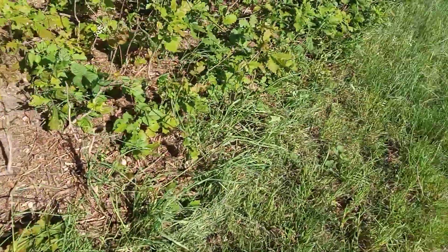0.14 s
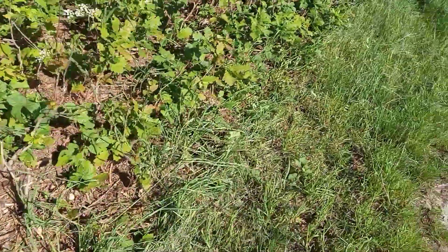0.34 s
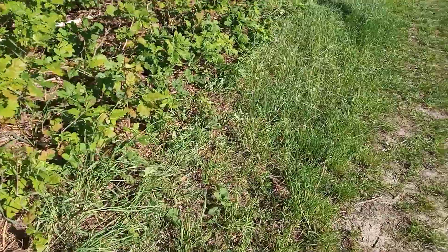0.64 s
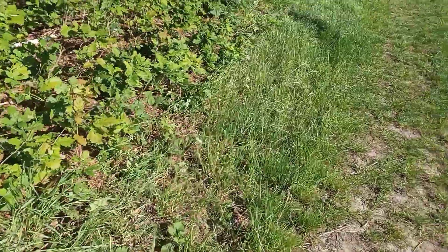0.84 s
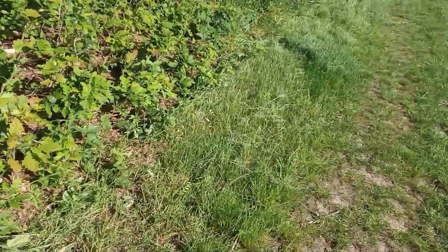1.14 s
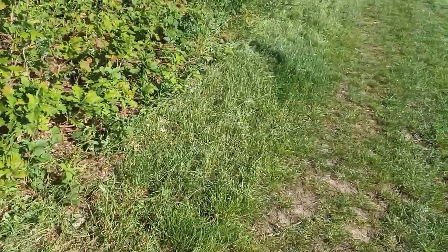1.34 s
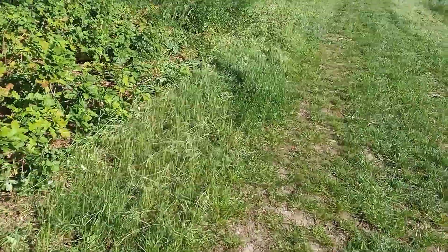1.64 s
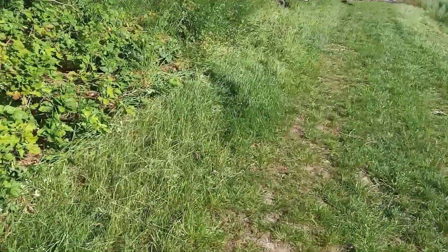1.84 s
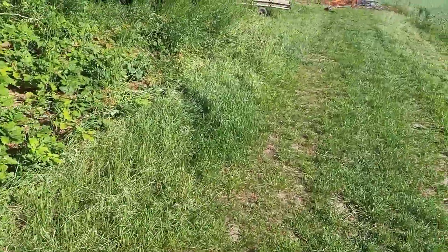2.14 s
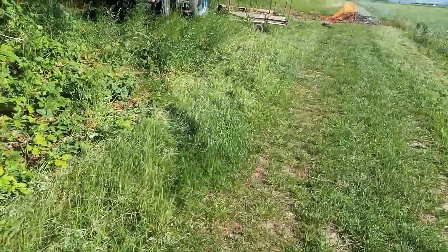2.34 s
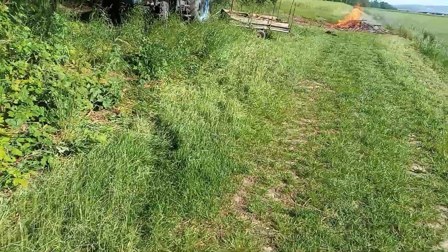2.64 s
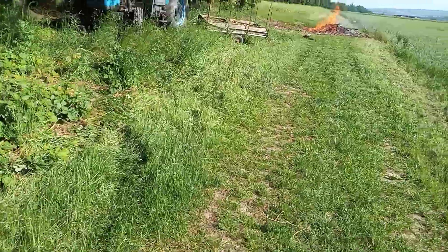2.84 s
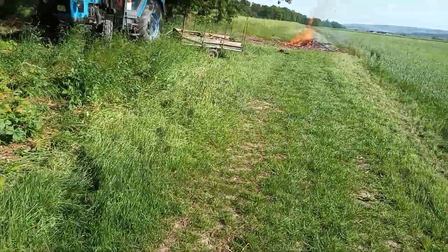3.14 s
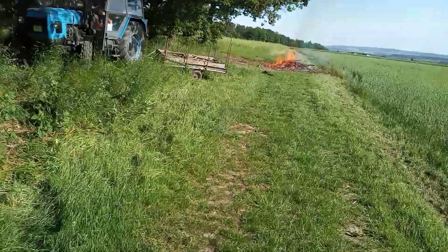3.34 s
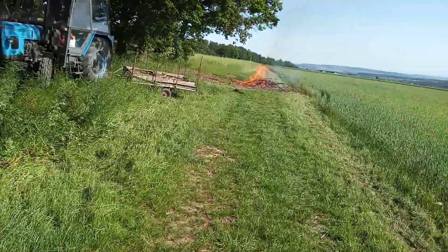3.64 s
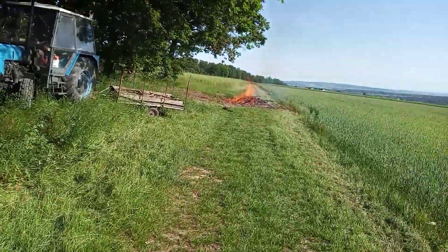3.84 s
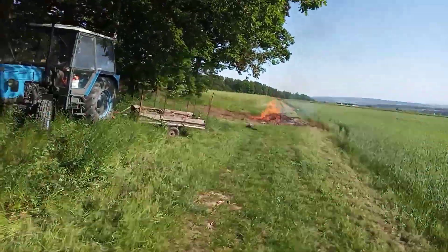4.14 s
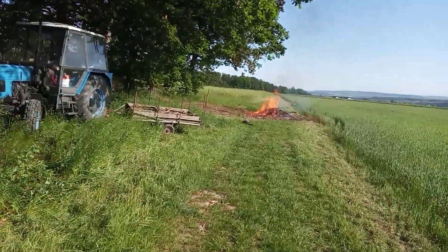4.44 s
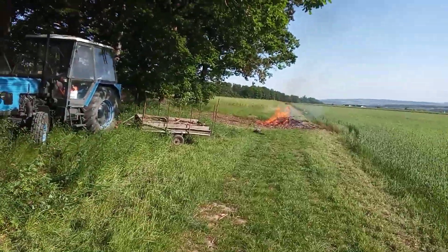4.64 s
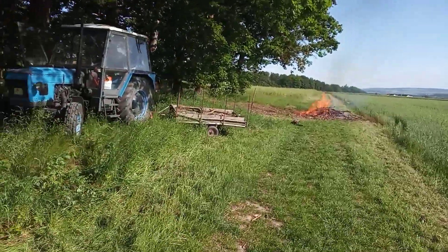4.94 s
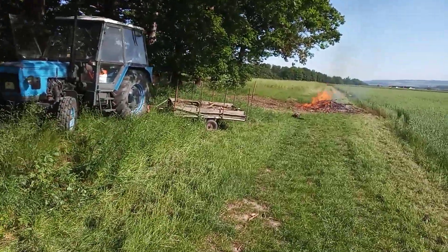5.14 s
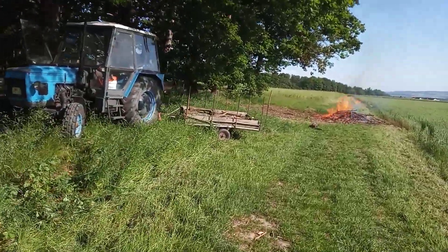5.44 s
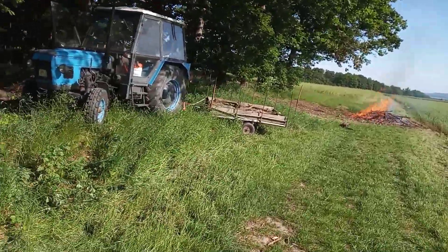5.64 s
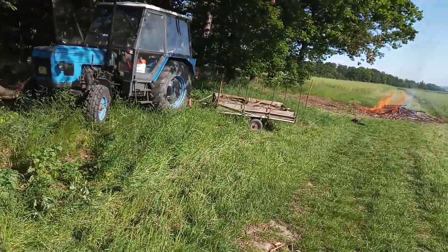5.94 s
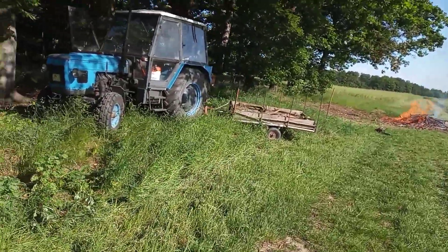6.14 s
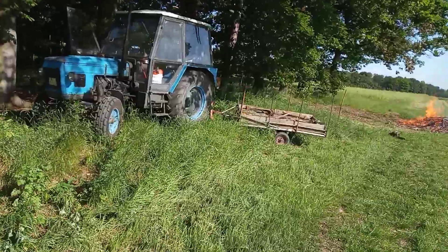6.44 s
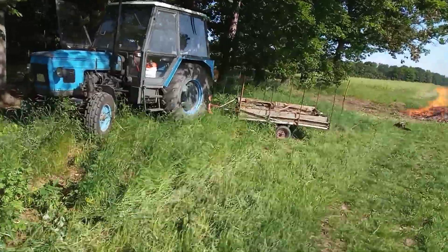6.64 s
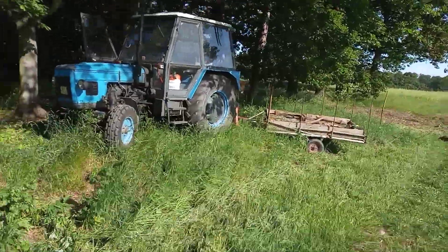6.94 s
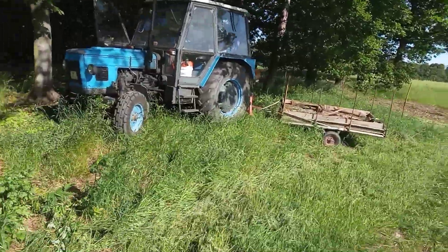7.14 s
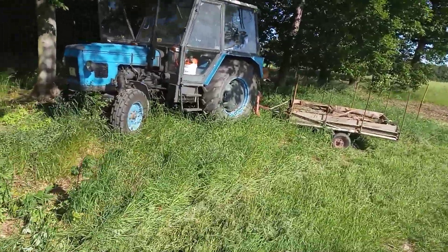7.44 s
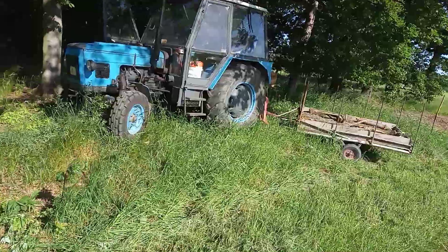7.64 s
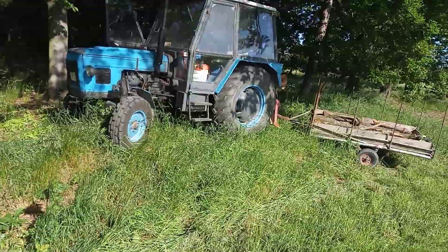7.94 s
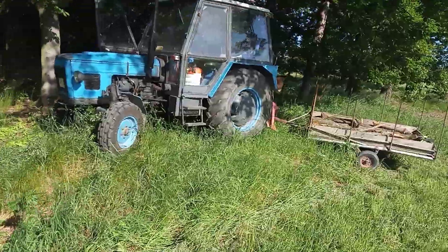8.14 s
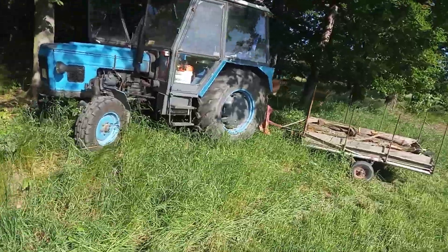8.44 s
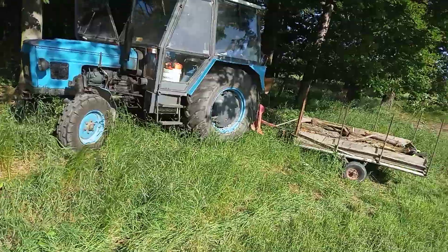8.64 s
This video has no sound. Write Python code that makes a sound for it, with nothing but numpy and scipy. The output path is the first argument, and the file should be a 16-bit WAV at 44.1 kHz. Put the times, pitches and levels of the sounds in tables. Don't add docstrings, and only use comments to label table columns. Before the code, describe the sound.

Dry crackling and steady fizzing of a burning brush pile outdoors, soft grass swishes, gusty low rumble, and faint bird notes early on.

```python
import sys
import numpy as np
from scipy import signal
from scipy.fft import rfft, irfft
from scipy.io import wavfile
from scipy.ndimage import uniform_filter1d

SR = 44100
rng = np.random.default_rng(int(sys.argv[2]) if len(sys.argv) > 2 else 0)


def transcribe(signal):
    frames = np.atleast_2d(signal).T
    limited = np.clip(frames, -1, 1)
    pcm = np.round(limited * 32767).astype(np.int16)
    wavfile.write(sys.argv[1], SR, pcm)


def invert_db(x):
    u = np.asarray(x, float) / 20
    return 10 ** u


N = 387198

# time_s, hiss_db, treble_gain_db
FIRE_VIGOUR = [(0.0, -52.5, -8), (0.24, -52.5, -9), (0.5, -59.5, -12), (0.7, -62, -9.5),
               (0.9, -55.5, -10.5), (1.69, -55, -17), (2.15, -54.5, -8), (2.5, -51, -11),
               (3.05, -59.5, -13), (3.4, -55, -13), (3.6, -52.5, -8.5), (4.35, -50, -8), (5.2, -50, -5),
               (6.21, -52, -6), (7.04, -51.5, -7), (7.78, -52.5, -6.5), (8.1, -48, -7), (8.78, -52, -10)]
# start_s, peak_db, body_db (relative), sizzle_db (relative)
CRACKS_GROUND = [(0.249, -29.5, -24, -20), (0.4129, -24.5, -24, -22.5), (0.5633, -34, -14.5, -15),
                 (0.6855, -29.5, -24.5, -28), (0.9602, -32, -23.5, -22), (0.9963, -30, -21, -24),
                 (1.0794, -32, -23, -19), (1.1601, -35.5, -13, -26), (1.1856, -25, -22.5, -26),
                 (1.206, -20, -29, -28), (1.3151, -31.5, -23.5, -19), (1.4949, -36.5, -23.5, -26),
                 (1.7315, -30.5, -29.5, -23), (1.8079, -27, -22, -21), (1.9668, -32, -19.5, -22.5),
                 (2.4894, -29.5, -24, -19), (2.6096, -32, -23, -16.5), (2.896, -29.5, -28.5, -27),
                 (2.9217, -27.5, -30.5, -28), (3.1462, -28.5, -18.5, -20), (3.3958, -37, -22.5, -24),
                 (3.647, -30.5, -16, -21), (3.6726, -29.5, -23.5, -28), (3.712, -33, -28, -25),
                 (3.867, -31, -24.5, -23), (3.949, -30.5, -19.5, -22), (3.9629, -26.5, -21, -20),
                 (4.0189, -33.5, -14, -24), (4.219, -30.5, -16.5, -23), (4.2939, -14.5, -18, -20.5)]
# start_s, peak_db, body_db (relative), sizzle_db (relative)
CRACKS_FIRE = [(4.771, -33, -25, -12), (4.8209, -34.5, -31, -17), (4.8785, -33, -19.5, -16),
               (5.0775, -30.5, -18, -20), (5.3168, -24, -25.5, -15), (5.3951, -29.5, -18.5, -13),
               (5.411, -19, -28, -24), (5.586, -32, -20.5, -16), (5.6156, -18, -29, -24.5),
               (5.6984, -27.5, -23, -19), (5.9061, -24, -22.5, -20), (6.1089, -29.5, -18.5, -25),
               (6.1396, -28, -21.5, -23), (6.1946, -23.5, -19.5, -24), (6.372, -18, -23, -18.5),
               (6.7946, -33, -24.5, -21.5), (6.9156, -29, -25, -19), (7.3152, -29.5, -27.5, -13),
               (7.555, -31.5, -32, -20), (7.714, -33.5, -18, -11), (7.8577, -24, -24, -25),
               (7.9294, -30, -20, -13.5), (8.0186, -26.5, -26, -21), (8.2514, -29.5, -23, -14),
               (8.3763, -23.5, -36, -28), (8.5105, -32, -23.5, -5.5), (8.527, -19, -34.5, -18),
               (8.5798, -23.5, -23, -13), (8.6616, -34, -18.5, -11.5), (8.713, -24.5, -23.5, -12)]
# start_s, peak_db, body_db (relative), sizzle_db (relative)
SMALL_TICKS = [(0.3361, -35, -22, -21), (0.7751, -39, -33, -13), (1.4277, -40, -13, -18),
               (1.5763, -30, -23, -18), (1.8357, -32, -20, -26), (1.9046, -37, -30, -20),
               (2.1675, -34, -21, -12), (2.6798, -37, -22, -17), (2.8125, -38, -22, -18),
               (4.573, -34, -19, -15), (4.6942, -34, -25, -16), (4.9082, -34, -22, -26),
               (5.006, -36, -25, -25), (5.1324, -41, -11, -16), (5.1622, -36, -16, -17),
               (5.3303, -24, -32, -23), (5.66, -26, -32, -19), (5.7169, -28, -23, -22),
               (6.0496, -38, -26, -14), (6.8493, -33, -18, -11), (7.441, -35, -25, -20)]
# start_s, peak_db, pitch_hz, echo_db (relative)
WOOD_POPS = [(0.632, -47, 1510, -30), (0.649, -42.5, 3080, -47), (0.843, -32, 3440, -29),
             (1.003, -40, 1300, -31), (1.737, -48.5, 1370, -24), (2.611, -73, 1500, -28),
             (3.146, -46.5, 3240, -15.5), (4.293, -26, 3140, -22), (5.414, -35.5, 3300, -27),
             (6.194, -44, 3570, -27.5), (6.371, -46.5, 3450, -13.5), (7.856, -49, 3300, -20),
             (8.688, -35, 1000, -18), (8.714, -43.5, 3350, -23)]
# low_hz, high_hz
FIRE_BANDS = [
    (900, 1800),
    (2700, 4500),
    (4500, 8500),
    (8500, 16500),
]
# frequency_hz, gain_db
PORT_COLOUR = [(1150, -29.5), (1530, -7), (1670, -14), (1850, -32), (2500, -31.5), (3280, -12.5),
               (3770, -22), (5200, -9.5), (6500, 1), (8000, -14), (10000, -16), (10700, -21),
               (11500, -17.5), (15300, -27)]
# peak_s, deep_db, die_s (by 30
# dB), upper_db (relative)
WIND_GUSTS = [(0.0, -53.5, 1.0, -4), (0.27, -57, 0, -2), (0.49, -80, 3, 13), (2.71, -78, .45, 5),
              (3.13, -70.5, 0.5, -4.5), (3.42, -65.5, .5, -8), (3.56, -65, .08, -15),
              (4.01, -65.5, 1.5, -8), (4.27, -67.5, 0, 6), (4.67, -49, 0.6, -3.5), (4.84, -49, .6, 0.5),
              (4.99, -45, .2, 10), (5.13, -54, 0.14, 12), (5.18, -50.5, 1.0, -4), (5.5, -52, .25, -2),
              (5.82, -51, 0.26, -9), (5.98, -44, 0.15, -4), (6.23, -56, 1.2, -4), (6.47, -45, 0.16, 0),
              (6.54, -48, .1, 4), (6.68, -47, 0.16, -10), (6.85, -55, .25, -4), (7.24, -69, 0.7, -4),
              (7.36, -70, .15, 9), (7.5, -44, .25, -12), (7.62, -63.5, .3, 6), (7.73, -52, 0.6, -4.5),
              (8.76, -75, .3, -1)]
# centre_s, peak_db, pitch_hz, cycles, swing (push 1, suck -1)
CASE_KNOCKS = [(2.5483, -58.5, 700, 2.9, 1), (2.7160, -37.5, 453, 0.46, 0.91),
               (2.7193, -39.5, 500, 0.55, 0.8), (2.7210, -29.5, 425, 0.27, 1),
               (2.7222, -37.5, 148, 0.43, -0.83), (2.858, -57, 400, 0.81, 0.65),
               (2.8617, -34.5, 424, 0.44, 0.73), (2.8663, -41.5, 453, 0.44, 0.89),
               (4.977, -32, 110, 0.66, -0.89), (4.9880, -26, 128, 0.5, -0.87),
               (5.072, -31, 109, 0.58, 0.92), (5.1354, -14, 234, 0.55, -0.37), (5.1356, -41, 520, 1.27, 1),
               (5.4132, -41.5, 890, 1.25, -0.74), (5.415, -39, 80, 0.57, 0.76)]
# centre_s, peak_db,
# pitch_hz, cycles
SOFT_RUSTLES = [(.22, -58, 267, 9.7), (0.847, -49.5, 1650, 4.4), (.87, -61, 1450, 30), (.92, -64, 1220, 35),
                (1.079, -71, 540, 9.4), (1.242, -64, 480, 11), (1.421, -70, 417, 7.6),
                (1.715, -65.5, 630, 13), (2.545, -60.5, 690, 11.3), (2.686, -55, 430, 2.7),
                (2.706, -45, 570, 1.9), (2.721, -50.5, 1700, 5.4), (2.862, -58, 1900, 4.3),
                (4.3, -57, 405, 2.6), (2.743, -70, 485, 6), (3.281, -70, 1150, 40), (4.83, -62.5, 456, 3.8),
                (4.96, -45, 254, 2.6), (5.076, -63, 523, 4.2), (5.369, -59, 970, 17), (5.51, -62, 865, 13),
                (5.901, -67, 417, 5.2), (5.986, -57, 255, 4), (6.201, -64.5, 1050, 25),
                (8.05, -72, 900, 30)]
# peak_s, swish_db, die_s (by 30 dB)
LEG_STRIDES = [(.22, -79, 0.5), (.9, -78.5, 1), (1.3, -77.5, 0.5), (2.05, -78.5, 1.5), (2.75, -83, .8),
               (3.79, -85, 2), (5.13, -78.5, .8), (5.6, -79.5, 2.5), (4.33, -78, 1), (6.42, -78, .6),
               (6.9, -82, .5), (7.3, -80, .7), (8.1, -73, .8)]
# time_s, pitch_hz, level_db
MOTOR_HUM = [(0.0, 112, -66), (0.18, 117.0, -57.5), (0.36, 115.2, -65), (1.13, 115.4, -62.5),
             (1.18, 115.7, -105), (1.27, 115.6, -60.5), (2.16, 116, -95), (2.3, 118, -96)]
# start_s, length_s, level_db
BIRD_WHISTLES = [(1.162, .23, -74), (1.988, 0.21, -70), (2.899, 0.219, -69)]
# time_s, pitch_hz, level_db
THIN_CALL = [
    (1.63, 9409, -71),
    (1.654, 9220, -58),
    (1.72, 9300, -87),
]

LOW_DB, LOW_FOLLOWS, STIR_LOW = -70.5, 0.67, 0.3
MIDDLE_DB, MIDDLE_FOLLOWS, STIR_MIDDLE = -64.5, 0.87, 0.13
TRAIL_S, TRAIL_SHARE = 0.012, 0.5
CRACK_GAIN_DB, BODY_DB, SIZZLE_DB, THUD_DB = -1, 6.5, 4, -12
ECHO_DB, ECHO_FOLLOWS = -22, 0.4
GROUND_S, GROUND_DB = 0.004, -7.5
FOREST_T60_S, FOREST_RISE_S, POP_T60_S = 0.19, 0.017, 0.26
POP_ECHO_DB_PER_OCTAVE = 8
GUST_RISE_S, CALM_DB = 0.12, -97.5
DUCK_FROM_DB, DUCK_SHARE, DUCK_S = -51, 0.53, 0.08
STRIDE_RISE_S, STILL_DB = 0.45, -97
AIR_DB, AIR_BED_DB, AIR_FOLLOWS = -6, -81, 0.15
BIRD_FROM_HZ, BIRD_TO_HZ, BIRD_FADE_DB = 2800, 2450, 6
LIMIT, CUTOFF_HZ = 0.2, 16000


def fire_hiss(port):
    sizes = invert_db(6.2 * np.minimum(rng.exponential(1, N), 3.1)) * rng.choice([-1, 1], N)
    snaps_per_s = 900 * invert_db(5 * drift(25))
    snaps = sizes * (rng.random(N) < snaps_per_s / SR)

    main_db, facing_db = in_time(FIRE_VIGOUR)
    swing_db = main_db - main_db.mean()
    stir_db = stride_level() - STILL_DB - 8.5
    low_db = LOW_DB + LOW_FOLLOWS * swing_db + STIR_LOW * stir_db
    middle_db = MIDDLE_DB + MIDDLE_FOLLOWS * swing_db + STIR_MIDDLE * stir_db
    levels_db = [low_db, middle_db, main_db, main_db + facing_db]

    flare = drift(20.0)
    fade = np.exp(-1 / TRAIL_S / SR)
    trail = np.sqrt(signal.lfilter([1 - fade], [1, -fade], rms_one(snaps) ** 2))
    smooth = rng.standard_normal(N) * (1 - TRAIL_SHARE + TRAIL_SHARE * trail)

    out = 0
    flare_depths_db, snap_shares = [1.4, 1.5, 1.9, 3.4], [0.7, 0.65, 1.1, 1.0]
    for db, depth_db, share, edges in zip(levels_db, flare_depths_db, snap_shares, FIRE_BANDS):
        tinted = rms_one(snaps * invert_db(5.1 * rng.standard_normal(N)))
        mix = signal.fftconvolve(share * tinted + smooth, band(port, *edges))[:N]
        out = out + invert_db(db + depth_db * flare + 1.24 * drift(7.1)) * rms_one(mix)
    return out


def cracks(port):
    s, db, body_db, sizzle_db = np.transpose(CRACKS_GROUND + CRACKS_FIRE + SMALL_TICKS)
    db = db + CRACK_GAIN_DB
    middle_db = body_db + BODY_DB
    shares_db = [middle_db + THUD_DB, middle_db, 0 * db, sizzle_db + SIZZLE_DB]
    echo_db = ECHO_DB + ECHO_FOLLOWS * (body_db - body_db.mean())

    out = 0
    diffuse = signal.fftconvolve(rng.standard_normal(N), port)[:N]
    for share_db, trim_db, edges in zip(shares_db, [-14.5, -7.5, -11, 1], FIRE_BANDS):
        colour = band(port, *edges)
        source = bursts(s, invert_db(db + share_db + trim_db), 0.00067)
        direct = signal.fftconvolve(source, colour / np.abs(colour).max())[:N]
        envelope = forest_echo(s, db + share_db + echo_db, FOREST_T60_S)
        out = out + direct + envelope * rms_one(band(diffuse, *edges))
    return out


def bursts(times, gains, decay_s, size=320):
    out = np.zeros(N + size)
    t = np.arange(size) / SR
    for s, gain, noise in zip(times, gains, rng.standard_normal((len(times), size))):
        late = t - GROUND_S * (0.5 + 0.5 * np.tanh(noise[-1]) ** 2)
        reflection = invert_db(GROUND_DB) * (late > 0) * np.exp(-np.abs(late) / decay_s)
        fall = np.exp(-t / decay_s) + reflection
        snap = 1.91 * np.sign(noise[0]) * (t == 0)
        start = int(s * SR)
        out[start:start + size] += gain * 0.25 * rms_one(snap + fall * noise)
    return out[:N]


def pops():
    s, db, hz, echo_db = np.transpose(WOOD_POPS)
    white, echo = rng.standard_normal(N), 0
    for trim_db, edges in zip([-4, -1, -2], [(330, 1400), (1000, 2060), (2000, 3050)]):
        octaves_away = np.abs(np.log2(hz / np.sqrt(np.prod(edges))))
        envelope = forest_echo(s, db + echo_db - POP_ECHO_DB_PER_OCTAVE * octaves_away, POP_T60_S)
        echo = echo + envelope * invert_db(trim_db + 4.2 * drift(12.3)) * rms_one(band(white, *edges))
    return blows(s + 0.00129, db + 1.0, hz, hz * 0.0011, 0 * s + 0.22, noisy=0.21) + echo


def forest_echo(times, db, t60_s):
    power = np.zeros(N)
    np.add.at(power, (np.asarray(times) * SR).astype(int), invert_db(db) ** 2)
    rise, fall = np.exp(-1 / FOREST_RISE_S / SR), invert_db(-120 / t60_s / SR)
    dying = signal.lfilter([1], [1, -fall], power + 1e-18)
    return np.sqrt(signal.lfilter([1 - rise], [1, -rise], dying))


def port_response(size=4096):
    hz, db = np.transpose(PORT_COLOUR)
    bins_hz = np.arange(size // 2 + 1) * SR / size
    log_gain = np.log(invert_db(np.interp(np.log(bins_hz + 1), np.log(hz), db)))
    cepstrum = irfft(log_gain)
    cepstrum[1:size // 2] *= 2
    cepstrum[size // 2 + 1:] = 0
    return irfft(np.exp(rfft(cepstrum)))[:size // 2]


def wind():
    deep_db, upper_db = gust_levels()
    white, lumps = rng.standard_normal((3, N)), drift(12.9)
    deep = invert_db(deep_db) * rms_one(invert_db(3.5 * lumps) * band(white[0], 50, 103.6))
    upper = invert_db(upper_db) * rms_one(invert_db(4.3 * lumps) * band(white[1], 71.3, 174.8, order=4))
    flutter_db = upper_db - 16.5 + 0.47 * (upper_db + 36.5)
    flutter = invert_db(flutter_db) * rms_one(invert_db(7.5 * lumps) * band(white[2], 171, 313, order=4))
    return deep + upper + flutter


def gust_levels():
    s, db, die_s, upper_db = np.transpose(WIND_GUSTS)
    deep = swells(s, db, die_s, GUST_RISE_S, CALM_DB)
    return deep, swells(s, db + upper_db, die_s, GUST_RISE_S, CALM_DB + 8)


def ducking():
    over_db = np.maximum(np.maximum(*gust_levels()) - DUCK_FROM_DB, 0)
    return invert_db(-DUCK_SHARE * uniform_filter1d(over_db, size=int(DUCK_S * SR)))


def hands():
    rustles = blows(*np.transpose(SOFT_RUSTLES), np.zeros(len(SOFT_RUSTLES)), noisy=0.49)
    return blows(*np.transpose(CASE_KNOCKS), noisy=0.062) + rustles


def blows(times, levels_db, pitches_hz, cycles, swings, noisy, size=8192):
    out = np.zeros(N + size)
    t = (np.arange(size) - size // 2) / SR
    noises = rng.standard_normal((len(times), size))
    for s, db, hz, count, swing, noise in zip(times, levels_db, pitches_hz, cycles, swings, noises):
        rough = noisy * rms_one(band(noise, 0.78 * hz, 1.154 * hz, order=2))
        wave = swing * np.cos(2 * np.pi * hz * t) + rough
        start = int(s * SR)
        out[start:start + size] += invert_db(db) * wave * np.exp(-(t * hz / count) ** 2)
    return np.r_[out[size // 2:], np.zeros(size)][:N]


def grass():
    stride_db, white = stride_level(), rng.standard_normal(N)
    low_db = AIR_BED_DB + AIR_FOLLOWS * (stride_db - stride_db.mean())
    low = invert_db(low_db + AIR_DB + 1.6 * drift(15)) * rms_one(band(white, 190, 700, order=2))
    return low + invert_db(stride_db - 0.5 + 4.5 * drift(11)) * rms_one(band(white, 2285, 3020, order=2))


def stride_level():
    return swells(*np.transpose(LEG_STRIDES), STRIDE_RISE_S, STILL_DB)


def swells(peaks_s, peaks_db, dies_s, rise_s, rest_db):
    t = np.arange(0, N, 64) / SR
    power = invert_db(rest_db) ** 2
    for s, db, die_s in zip(peaks_s, peaks_db, dies_s):
        power = power + invert_db(db - 30 * np.maximum((s - t) / rise_s, (t - s) / die_s)) ** 2
    return np.interp(np.arange(N) / SR, t, 10 * np.log10(power))


def motor():
    return tone(MOTOR_HUM, 1.3, 11, 2.13)


def birds():
    return tone(THIN_CALL, 6.2, 63, 45) + sum(whistle(*row) for row in BIRD_WHISTLES)


def whistle(s, length_s, db):
    rows = [(s, BIRD_FROM_HZ, db - BIRD_FADE_DB),
            (s + 0.2 * length_s, BIRD_FROM_HZ - 70, db),
            (s + length_s, BIRD_TO_HZ, db - BIRD_FADE_DB)]
    return tone(rows, 2.5, 150, 45)


def tone(rows, waver_db, waver_hz, spread_hz):
    hz, db = in_time(rows)
    t = np.arange(N) / SR
    gate = np.clip(np.minimum(t - rows[0][0], rows[-1][0] - t) / 0.0045, 0, 1)
    phase = 2 * np.pi * np.cumsum(hz + spread_hz * drift(waver_hz)) / SR
    return np.sqrt(2) * gate * invert_db(db + waver_db * drift(waver_hz)) * np.sin(phase)


def rms_one(x):
    return x / np.sqrt(np.mean(x ** 2) + 1e-30)


def in_time(rows):
    s, *columns = np.transpose(rows)
    return [np.interp(np.arange(N) / SR, s, c) for c in columns]


def band(x, low_hz, high_hz, order=3):
    return signal.sosfilt(signal.butter(order, [low_hz, high_hz], "band", fs=SR, output="sos"), x + 1e-18)


def drift(rate_hz):
    r = np.exp(-2 * np.pi * rate_hz / SR)
    return rms_one(signal.lfilter([1], [1, -2 * r, r * r], rng.standard_normal(N + SR))[SR:])


def scene():
    port = port_response()
    fire = ducking() * fire_hiss(port) + cracks(port) + pops()
    return (fire + wind() + hands() + grass() + motor() + birds())[None]


def top_cut(x):
    return signal.sosfilt(signal.butter(12, 16810, fs=SR, output="sos"), x)


def record(dry):
    rounded = LIMIT * np.tanh(dry / LIMIT)
    x = signal.sosfilt(signal.butter(2, 40, "high", fs=SR, output="sos"), rounded)
    x = signal.sosfilt(signal.cheby2(10, 30, CUTOFF_HZ, fs=SR, output="sos"), x)
    return top_cut(x)


dry = scene()
out = record(dry)
transcribe(out)
```